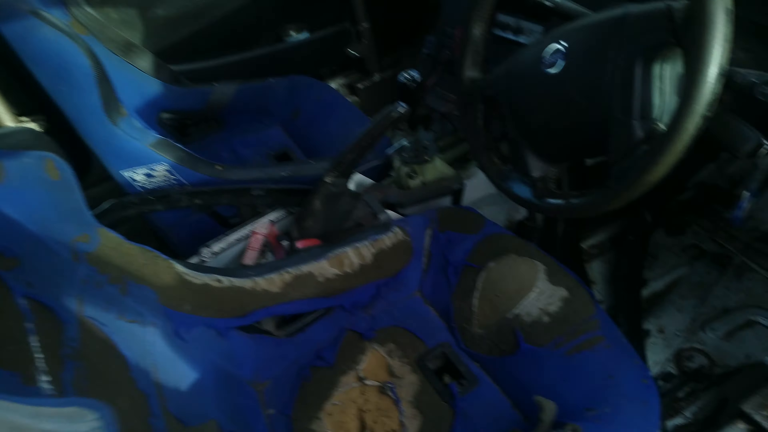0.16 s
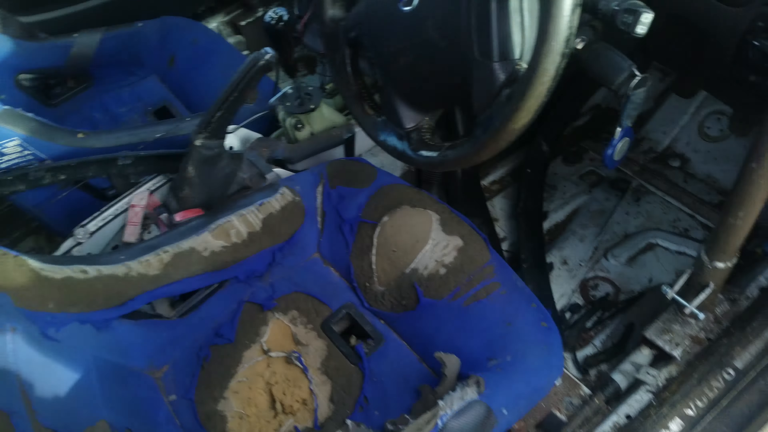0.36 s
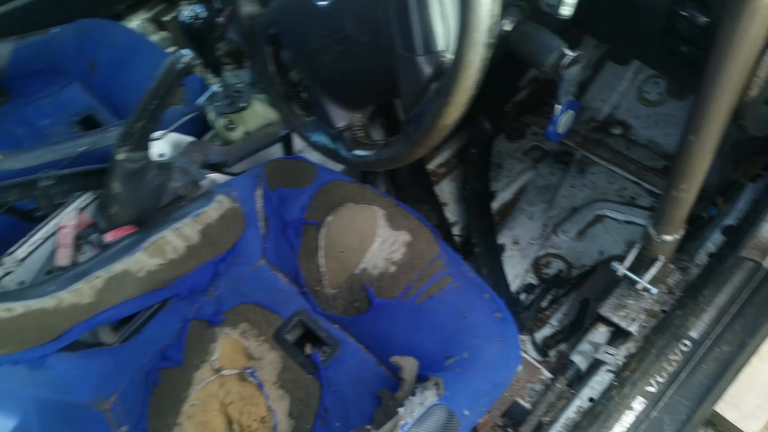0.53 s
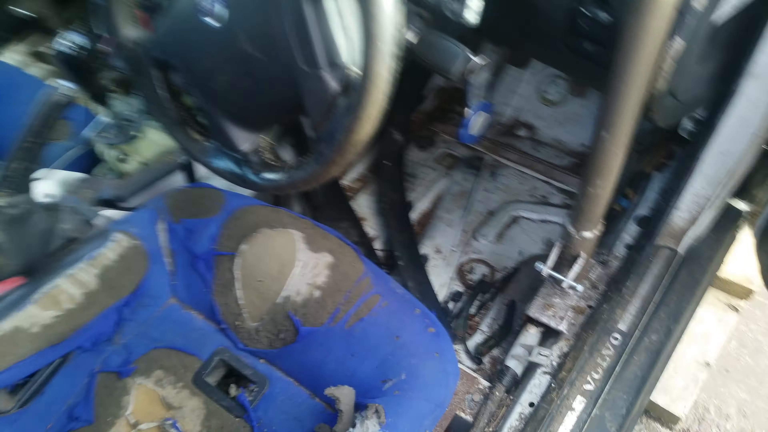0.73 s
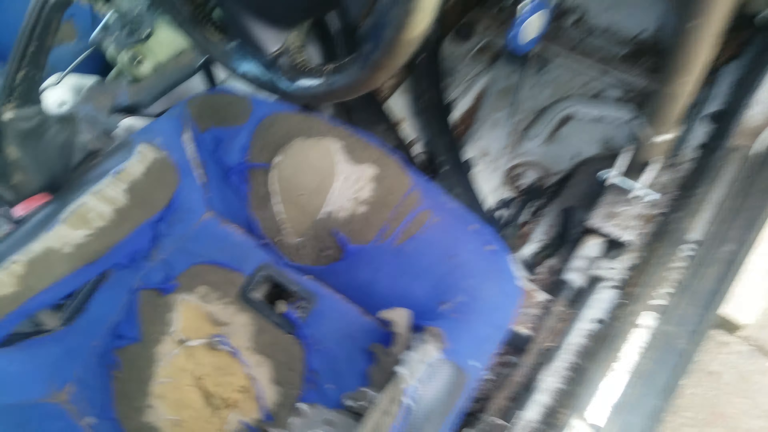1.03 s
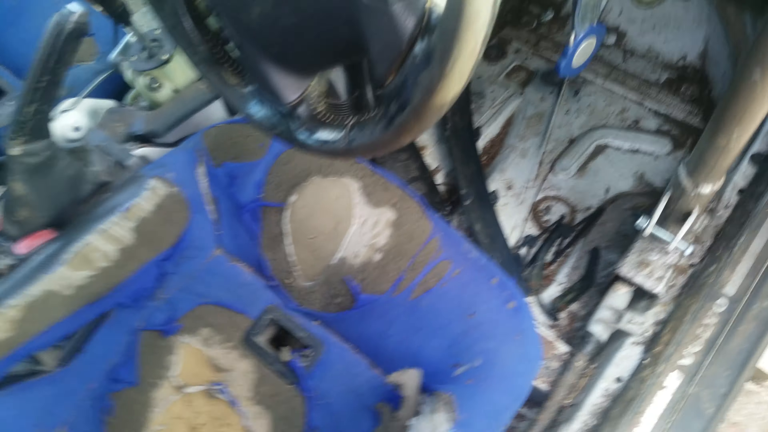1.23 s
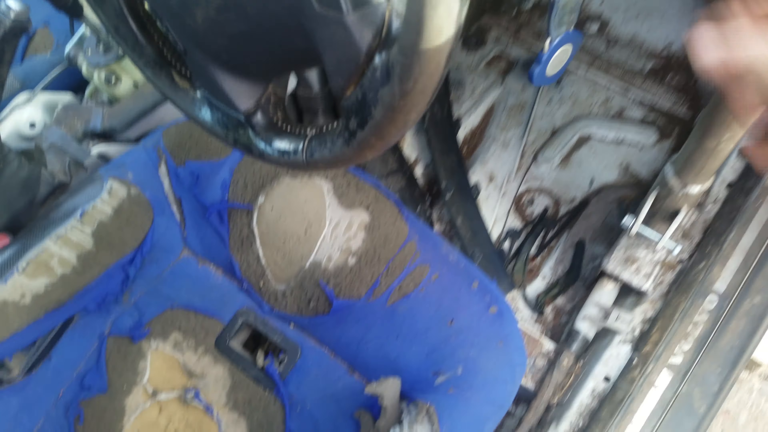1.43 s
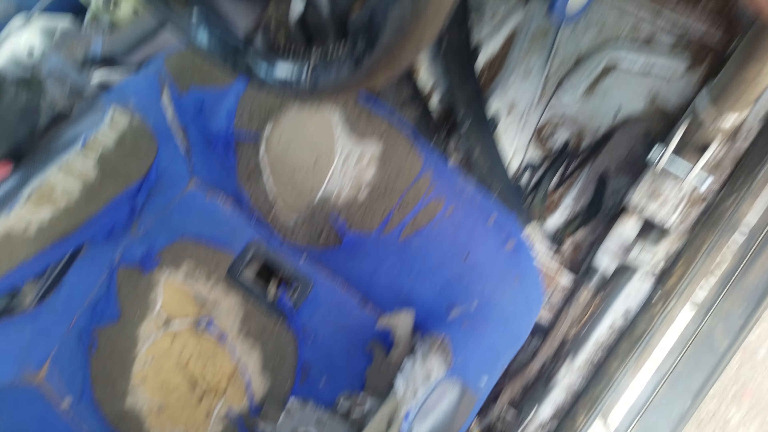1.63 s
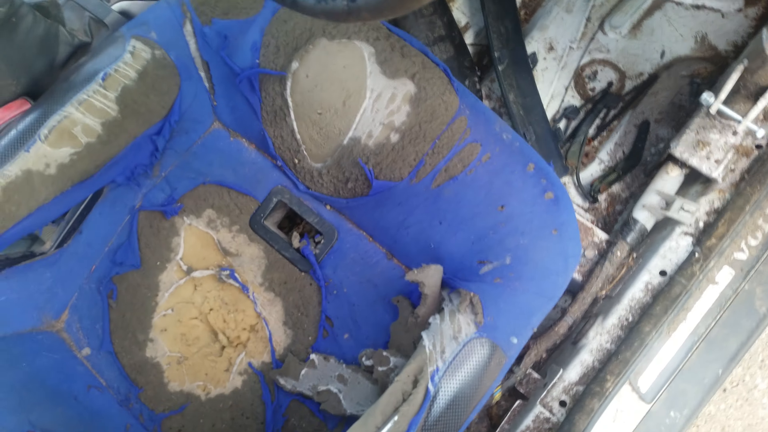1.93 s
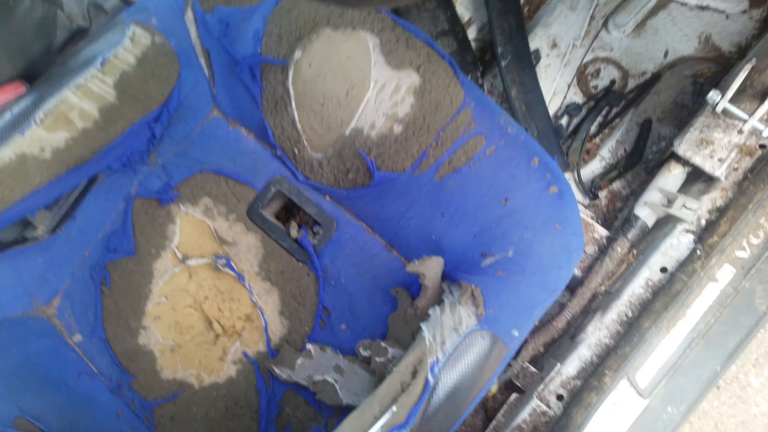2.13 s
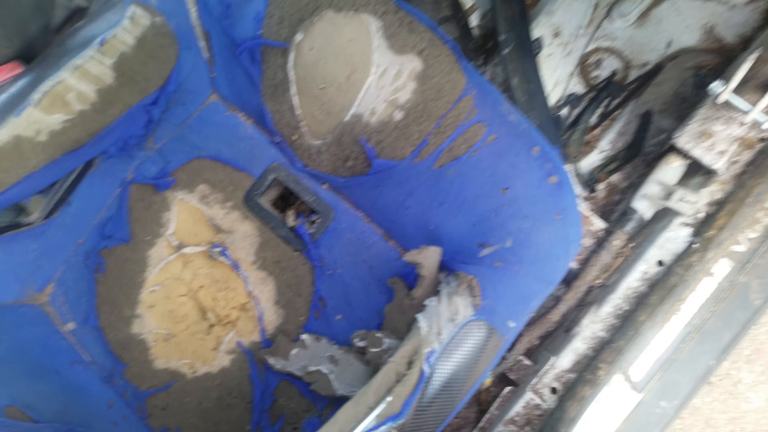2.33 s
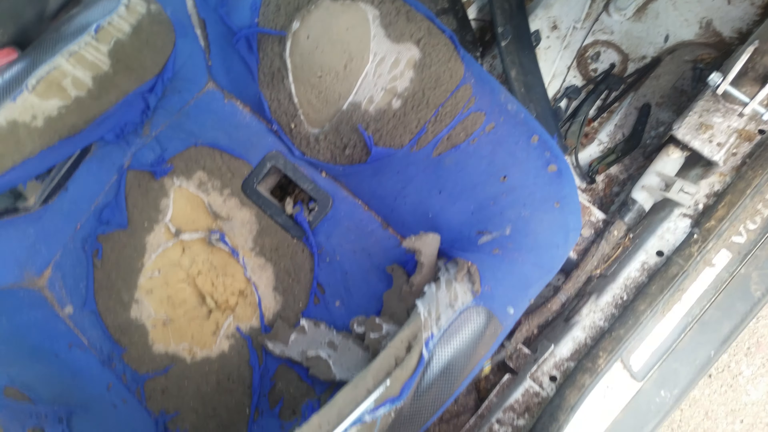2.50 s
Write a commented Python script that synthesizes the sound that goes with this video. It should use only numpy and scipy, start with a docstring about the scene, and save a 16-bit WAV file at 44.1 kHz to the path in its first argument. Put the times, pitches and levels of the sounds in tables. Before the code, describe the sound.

A car engine idles unevenly with low thumps, ticking puffs and some microphone handling bumps.

```python
"""At the open door of a stripped car, a five-cylinder engine idles unevenly.
Each firing thumps out of the exhaust and booms in pipe and cabin; some are weak. Once a crank turn
a puff of gas hisses and rings metal parts. Valves, belts and panels blend to a rush under a thin
hiss and whistle; there is one high spit, and a loose part clanks. Bumps and a hand rubbing on the
body of a hand-held camera reach mostly the right microphone."""
import sys
import numpy as np
from scipy import signal
from scipy.fft import rfft, irfft
from scipy.io import wavfile
from scipy.ndimage import uniform_filter1d

SR = 44100
rng = np.random.default_rng(int(sys.argv[2]) if len(sys.argv) > 2 else 0)


def int16_out(signal):
    """Quantize to a 16-bit WAV file."""
    q = np.round(np.clip(np.atleast_2d(signal).T, -1, 1) * 32767)
    wavfile.write(sys.argv[1], SR, q.astype(np.int16))


N = 117306
TIME_S = np.arange(N) / SR
FREQ_HZ = np.fft.rfftfreq(N, 1 / SR)
LEFT_LAG_S = 0.00027
LOW_PAN_DB, HIGH_PAN_DB = [[0], [-4.5]], [[2.25], [-2.25]]  # left, right


def amp(db):
    return 10 ** (np.asarray(db) / 20)


def unit_rms(x):
    return x / np.sqrt(np.mean(x ** 2) + 1e-20)


def over_freq(rows):
    hz, value = np.transpose(rows)
    return np.interp(np.log(FREQ_HZ + 1), np.log(hz + 1), value)


def over_time(rows, column=1, at_s=TIME_S):
    rows = np.array(rows)
    return np.interp(at_s, rows[:, 0], rows[:, column])


def add(mix, start_s, sound):
    at = round(start_s * SR)
    sound = sound[max(-at, 0):]
    part = mix[max(at, 0):][:len(sound)]
    part += sound[:len(part)]


def butter(order, hz, kind="low"):
    return signal.butter(order, hz, kind, fs=SR, output="sos")


def flicker(depth_db, samples):
    return amp(depth_db * unit_rms(uniform_filter1d(rng.standard_normal(N), samples)))


def resonate(x, hz, width_hz):
    """Unity-gain resonance; hz may be a curve."""
    carrier = np.exp(2j * np.pi * np.cumsum(hz * np.ones(len(x))) / SR)
    pole = np.exp(-np.pi * width_hz / SR)
    return 2 * (carrier * signal.lfilter([1 - pole], [1, -pole], x / carrier)).real


def noise_band(hz, width_hz, samples=N):
    once = resonate(rng.standard_normal(samples), hz, width_hz)
    return unit_rms(resonate(once, hz, width_hz))


# Panel and block modes: centre_hz, width_hz, lift_db
BODY_MODES = [(461.5, 78, 10.5), (738, 57, 6), (892, 43, 7), (1016, 72, 4.5), (1315, 25, 5.5),
              (1788, 51, 4), (3030, 37, 8), (3430, 12, 5.5), (4990, 60, 2), (5316, 49, 3), (7250, 570, 3.5)]
# Left-right likeness: freq_hz, coherence
COHERENCE = [(60, 0.84), (300, 1), (800, 0.93), (2000, 0.19), (5000, 0.065)]
# Stereo balance: freq_hz, left_minus_right_db
BALANCE = [(60, 12.5), (100, 7), (170, 10), (290, 0.5), (500, 4), (850, 3.5), (1440, 4), (2450, 0),
           (4160, -15.5), (7070, -24.5)]

def engine_noise(spectrum, envelope):
    """Shaped noise through the ringing panels and block, in stereo."""
    common, separate = rfft(rng.standard_normal((2, N)) * envelope)
    lift_db = sum(db * np.exp(-2 * ((FREQ_HZ - hz) / width) ** 2) for hz, width, db in BODY_MODES)
    colour = amp(over_freq(spectrum) + lift_db) * (FREQ_HZ > spectrum[0][0] / 2)
    coherence, pan_db = over_freq(COHERENCE), over_freq(BALANCE)
    left = coherence * common + np.sqrt(1 - coherence ** 2) * separate
    left *= np.exp(-2j * np.pi * FREQ_HZ * LEFT_LAG_S)
    pair = np.array([left * amp(np.minimum(pan_db, 0)), common * amp(-np.maximum(pan_db, 0))])
    return irfft(pair * unit_rms(colour), N)


# Crank turns: start_s, puff_db
CRANK_TURNS = [(-0.05, -44), (0.021, -60.5), (0.0902, -68.5), (0.1594, -44), (0.2344, -42.5), (0.3016, -41),
               (0.367, -39.5), (0.4318, -37.5), (0.504, -45.5), (0.5755, -41.5), (0.6553, -42),
               (0.7342, -36.5), (0.8077, -39.5), (0.8812, -40), (0.9601, -41.5), (1.046, -39),
               (1.1371, -39.5), (1.2268, -33), (1.304, -37), (1.3753, -36), (1.4508, -36.5), (1.5351, -34),
               (1.6197, -36), (1.7048, -32.5), (1.7861, -36), (1.869, -30.5), (1.9473, -34.5),
               (2.032, -30.5), (2.115, -45.5), (2.197, -39), (2.2775, -44), (2.352, -47), (2.4293, -44),
               (2.5127, -42), (2.596, -48), (2.6843, -50)]
TURN_START_S = np.array(CRANK_TURNS)[:, 0]
# Engine as heard, camera gain ducked at the start and near 2.1 s: time_s, exhaust_db, mechanical_db
HEARD_LEVELS = [(0, -48, -19.5), (.13, -20.5, -4), (.2, -7, -3), (.33, -5.5, 4), (.45, -9, 0),
                (.62, -15.5, -4), (.78, -5.5, 1), (1.1, -11.5, -1.5), (1.37, -2.5, 5), (1.6, -6, 2.5),
                (1.82, -4, 3.5), (2.05, -3.5, 4), (2.09, -7, -22.5), (2.2, -9, -1.5), (2.3, -6.5, -0.5),
                (2.66, -11.5, -8)]
# Puff spectrum: freq_hz, density_db
PUFF_SPECTRUM = [(180, -40.5), (300, -10.5), (581, -8), (711, -1.5), (882, -5.5), (1170, -2), (1640, -11),
                 (1930, -11.5), (2390, -12.5), (3220, -19), (3730, -17.5), (4600, -17.5), (6750, -16),
                 (7520, -26.5), (9780, -54.5), (16500, -120)]

def gas_puffs():
    """Gas escapes in a bright puff each turn and a dull one partway through every second turn."""
    rise_s, hold_s, t60_s, lead_s = 0.007, 0.011, 0.13, 0.007
    t = np.arange(6000) / SR
    decay = amp(-60 * np.maximum(t - rise_s - hold_s, 0) / t60_s)
    shape = np.minimum(t / rise_s, 1) ** 2 * decay
    bright_env, dull_env = np.zeros((2, N))
    dull_db = rng.normal(-32.5, 3.5, len(CRANK_TURNS))
    for k, turn_s in enumerate(np.diff(TURN_START_S)):
        start_s, puff_db = CRANK_TURNS[k]
        add(bright_env, start_s - lead_s, amp(puff_db + 4) * shape)
        if k % 2 == 0:
            add(dull_env, start_s + 0.417 * turn_s, amp(dull_db[k]) * shape)
    grit = flicker(depth_db=1, samples=90)
    dull_env *= amp(over_time(HEARD_LEVELS, column=2))
    dull = signal.sosfilt(butter(2, hz=1490), engine_noise(PUFF_SPECTRUM, dull_env * grit))
    bright = engine_noise(PUFF_SPECTRUM, bright_env * grit)
    puff_index = np.searchsorted(TURN_START_S - lead_s, TIME_S)
    return bright + dull + clatter(bright, puff_index) + metal_ticks(bright, puff_index)


# Clatter in the puffs: time_s, gain_db
CLATTER_GAIN = [(0, 12), (.16, 13.5), (.7, 5), (.8, -3.5), (1.3, -7), (2.66, 6)]
# Clatter darkening: time_s, pitch_ratio
CLATTER_PITCH = [(0, 1.64), (.7, 1.03), (2.66, 0.95)]

def clatter(puffs, puff_index):
    """Each puff rings at its own midrange pitch."""
    base_hz = 1600
    detune = np.exp(rng.normal(0, 0.16, len(CRANK_TURNS) + 1))
    pitch_hz = base_hz * over_time(CLATTER_PITCH) * detune[puff_index]
    ring = np.array([resonate(side, pitch_hz, width_hz=550) for side in puffs])
    return ring * amp(over_time(CLATTER_GAIN))


TICK_MODES_HZ = [3260, 5176, 5950, 6800]

def metal_ticks(puffs, puff_index):
    """Metal parts rung by the puffs, each to a random strength per puff."""
    gains = amp(rng.uniform(-2, 8, (len(CRANK_TURNS) + 1, len(TICK_MODES_HZ))))
    return sum(np.array([resonate(side * gain, hz, width_hz=206) for side in puffs])
               for hz, gain in zip(TICK_MODES_HZ, gains[puff_index].T))


# Mechanical rush spectrum: freq_hz, density_db
RUSH_SPECTRUM = [(88, -22.5), (150, -6.5), (308, -18), (480, -33.5), (556, -38), (747, -30), (824, -32),
                 (1050, -30.5), (1640, -32), (3110, -42), (4100, -44.5), (6710, -37), (7520, -52.5),
                 (9780, -100.5), (16500, -120)]

def mechanical_rush(rush_db=-33.5, rumble_db=-31):
    """Valves, belts and panels blend to a rush over a low rumble."""
    level = amp(over_time(HEARD_LEVELS, column=2))
    flutter = flicker(depth_db=1.5, samples=900)
    common, right_only = signal.sosfilt(butter(2, [30, 190], "band"), rng.standard_normal((2, N)))
    rumble = unit_rms(common) * amp(LOW_PAN_DB)
    rumble[1] += 0.073 * unit_rms(right_only)
    rush = engine_noise(RUSH_SPECTRUM, level * flutter)
    return amp(rush_db) * rush + amp(rumble_db) * level * rumble


# Hand rubbing: time_s, right_db, left_db
RUB_LEVELS = [(0, -17.5, -16.5), (.07, -24.5, -62), (.1, -19, -15), (.16, -16.5, -22.5), (.23, -25.5, -19),
              (.26, -36.5, -28), (.35, -18.5, -34), (.46, -19.5, -44), (.54, -32, -47), (1.82, -35, -41.5),
              (1.88, -29.5, -26.5), (1.95, -15, -32), (2.01, -19.5, -30), (2.08, -16.5, -33),
              (2.18, -15, -27), (2.24, -35.5, -36), (2.3, -36, -42)]
# Rubbing spectrum: freq_hz, gain_db
RUB_SPECTRUM = [(20, -9.5), (60, -1.5), (150, 0), (300, -4), (500, -18), (900, -24.5), (1500, -44),
                (3000, -74.5), (16000, -89)]

def hand_rub(slips_per_s=900, spread_db=2.5):
    """Tiny slips of the hand on the camera make a lumpy noise, separate per microphone."""
    slips = (rng.random((2, N)) < slips_per_s / SR) * rng.choice([-1., 1.], (2, N))
    slips *= amp(spread_db * np.minimum(rng.exponential(1, (2, N)), 3))
    rub = unit_rms(irfft(rfft(slips) * amp(over_freq(RUB_SPECTRUM)), N))
    return rub * amp([over_time(RUB_LEVELS, column=2), over_time(RUB_LEVELS, column=1)])


# Bumps on the casing: time_s, level_db, pitch_hz
CASING_BUMPS = [(0.0175, -7.5, 638), (0.0222, -9, 560), (0.0245, -5, 736), (0.0275, -6, 604),
                (0.0572, -4, 560), (0.0605, -9, 480), (0.0646, -0.5, 904), (0.0685, -4, 420),
                (0.0716, 2, 620), (0.093, -4.5, 573), (0.114, -13.5, 474), (0.1235, -4, 400),
                (0.1262, -2, 560), (0.1344, -5, 586), (0.1429, -12.5, 450), (0.1492, -12.5, 413),
                (0.1552, -14, 476), (0.1664, -17, 575), (0.225, -12, 590), (0.449, -11, 440),
                (1.9412, -5, 464), (1.9487, -12, 483), (1.9609, -6, 416), (1.9862, -9.5, 456),
                (2.032, -8, 447), (2.0383, -12.5, 744), (2.045, -21, 746), (2.0533, -18, 663),
                (2.0693, -10, 496), (2.0752, -4.5, 459), (2.084, -14, 468), (2.118, -9, 480),
                (2.1236, -14, 435), (2.1352, -4, 620), (2.1372, -4, 400), (2.1427, -8, 442),
                (2.148, 1, 603), (2.1552, -6, 508), (2.1655, -4, 640), (2.1734, -9.5, 570),
                (2.1835, -5, 483)]

def casing_bumps(decay_cycles=0.23, scuff_s=0.0027, snap_s=2.1127, snap_width_s=0.00023):
    """The camera casing knocks and scuffs, high knocks scuffing more; once it snaps sharply."""
    out, t = np.zeros(N), np.arange(-600, 600) / SR
    scuff_env = np.exp(-abs(t) / np.where(t < 0, scuff_s / 1.96, scuff_s))
    for (time_s, level_db, hz), phase in zip(CASING_BUMPS, rng.random(len(CASING_BUMPS))):
        knock = np.exp(-abs(t * hz / decay_cycles) ** 0.65) * np.cos(2 * np.pi * (hz * t + phase))
        scuff = noise_band(0.8 * hz, 1.6 * hz, len(t)) * scuff_env
        scuff_db = -10.5 + 8.5 * np.log2(hz / 600)
        add(out, time_s + t[0], amp(level_db) * (knock + amp(scuff_db) * scuff))
    out = signal.sosfiltfilt(butter(3, hz=1830), out)
    snap = t / snap_width_s * np.exp(1 - np.hypot(t / snap_width_s, 0.58))
    add(out, snap_s + t[0], amp(2) * snap)
    return out * amp([[-30], [0]])


# Top hiss and whistle: time_s, whistle_hz, hiss_db, whistle_db
HISS_AND_WHISTLE = [(0, 12600, -91, -103), (.3, 12400, -69, -85), (.68, 12600, -74.5, -81),
                    (.77, 12600, -67, -74), (1.0, 12850, -73, -84), (1.1, 13450, -75, -76),
                    (1.3, 13330, -67, -73), (1.7, 13600, -67, -70), (1.8, 13420, -66, -71),
                    (2.05, 13480, -63, -69), (2.1, 13600, -78, -82), (2.24, 13600, -74, -80),
                    (2.66, 13500, -85, -89)]

def high_hiss(lift_db=5):
    """One channel of airy hiss that lifts with each puff."""
    turn_phase = np.interp(TIME_S, TURN_START_S, np.arange(len(TURN_START_S))) % 1
    lift = np.exp(-((turn_phase - 0.15) / 0.073) ** 2)
    band = resonate(rng.standard_normal(N), hz=13300, width_hz=3700)
    air = unit_rms(signal.sosfilt(butter(6, 8500, "high"), band))
    return air * amp(over_time(HISS_AND_WHISTLE, column=2) + lift_db * lift)


def whistle():
    """One channel of faint, fuzzy whistle: narrow noise drifting in pitch."""
    tone = noise_band(over_time(HISS_AND_WHISTLE), width_hz=280)
    return tone * amp(over_time(HISS_AND_WHISTLE, column=3))


# Weak firings: time_s, gain_db
WEAK_FIRINGS = [(0.351, -6), (0.43, -10), (0.486, -27), (0.514, -7.5), (0.543, -12), (0.573, -26),
                (0.604, -27), (0.878, -9), (0.941, -19), (1.044, -23), (1.079, -37), (1.224, -11.5),
                (1.464, -24.5), (1.532, -15), (1.565, -5.5), (2.095, -30), (2.128, -21), (2.195, -15),
                (2.411, -6), (2.575, -22), (2.609, -10)]
# Exhaust pipe reflections: delay_s, signed_gain
PIPE_REFLECTIONS = [(0.011, -0.14), (0.0236, -0.54), (0.034, -0.23)]
# Pipe and cabin modes: centre_hz, width_hz, gain_db
BOOM_MODES = [(30.7, 24, -5), (58.4, 10, -7), (114.5, 11, -9), (158, 5.8, -15), (205, 20, -4)]
LONG_FIRINGS_S = np.array([0.351, 1.005, 1.43])

def exhaust(turns_per_firing=0.4, thump_hz=105.2, width_s=0.0032):
    """A suck-then-push thump per firing, its pipe echoes and the cabin boom."""
    firing_turns = np.arange(0.16, len(TURN_START_S) - 1, turns_per_firing)
    firing_s = np.interp(firing_turns, np.arange(len(TURN_START_S)), TURN_START_S)
    firing_db = over_time(HEARD_LEVELS, at_s=firing_s)
    for time_s, gain_db in WEAK_FIRINGS:
        firing_db[np.argmin(abs(firing_s - time_s))] += gain_db
    out, t = np.zeros(N), np.arange(-1600, 1600) / SR
    for time_s, gap_s, level_db in zip(firing_s, np.gradient(firing_s), firing_db):
        rings_long = min(abs(time_s - LONG_FIRINGS_S)) < gap_s / 2
        stretch, trim_db = (2.2, -3) if rings_long else (1, 0)
        envelope = amp(level_db + trim_db) * np.exp(-0.5 * ((t + width_s / 2) / (width_s * stretch)) ** 2)
        add(out, time_s + t[0], envelope * np.cos(2 * np.pi * thump_hz * t))
        echo_hz = thump_hz * (1 + 0.35 * np.tanh(rng.normal()))
        echo_gain = min(gap_s / 0.034, 1) ** 6.1 * rng.normal(1, 0.15)  # weaker as firings crowd
        echo = echo_gain * envelope * np.cos(2 * np.pi * echo_hz * t)
        for delay_s, gain in PIPE_REFLECTIONS:
            add(out, time_s + delay_s + t[0], gain * echo)
    boom = sum(amp(db) * resonate(out, hz, width_hz) for hz, width_hz, db in BOOM_MODES)
    return (out + boom) * amp(LOW_PAN_DB)


def spit(start_s=0.705, rise_s=0.0052, length_s=0.032, fade_s=0.008):
    """One channel of a brief high hiss."""
    attack = np.clip((TIME_S - start_s) / rise_s, 0, 1)
    decay = np.exp(-np.maximum(TIME_S - start_s - length_s, 0) / fade_s)
    return amp(-51) * attack * decay * noise_band(hz=13000, width_hz=4300)


# Loose part: start_s, level_db, pitch_hz
LOOSE_CLANKS = [(1.228, -24, 1075), (1.309, -31, 1310), (1.338, -31, 1300), (1.835, -27, 1120)]

def clanks(rise_s=0.005, t60_s=0.11):
    """Short rings of loose metal, reaching the right side first."""
    out, t = np.zeros((2, N)), np.arange(5000) / SR
    for start_s, level_db, pitch_hz in LOOSE_CLANKS:
        envelope = np.minimum(t / rise_s, 1) * amp(level_db - 60 * t / t60_s)
        ring = envelope * np.sin(2 * np.pi * (pitch_hz * t + rng.random()))
        add(out[0], start_s + LEFT_LAG_S, ring)
        add(out[1], start_s, ring)
    return out


def scene():
    engine = exhaust() + gas_puffs() + clanks() + mechanical_rush()
    handling = casing_bumps() + hand_rub()
    treble = np.array([spit() + whistle() + high_hiss() for _ in range(2)])
    return engine + handling + treble * amp(HIGH_PAN_DB)


def record(dry):
    """Low cut, soft ceiling and band limit."""
    cut = signal.sosfilt(butter(2, 18, "high"), dry)
    limited = np.tanh(cut / 1.308) * 1.292
    lowpass = signal.firwin(511, 15800, window=("kaiser", 9), fs=SR)
    return signal.oaconvolve(limited, lowpass[None], "same")


dry = scene()
out = record(dry)
int16_out(out)
```